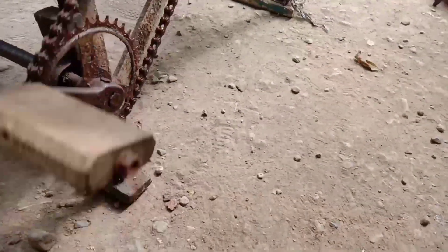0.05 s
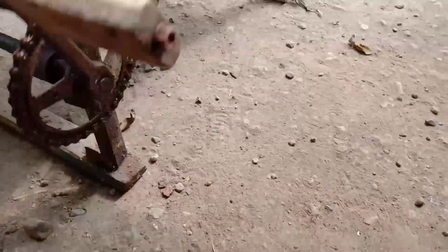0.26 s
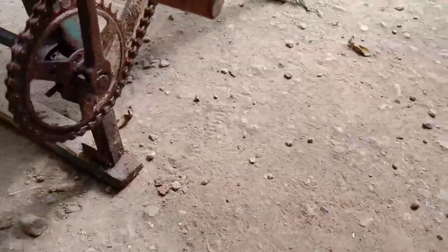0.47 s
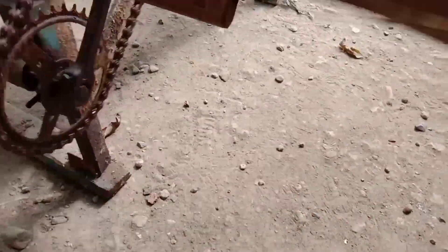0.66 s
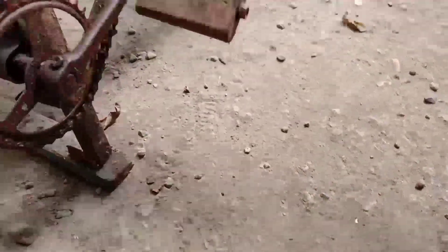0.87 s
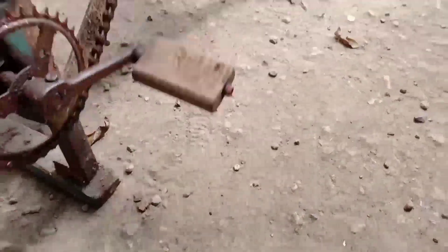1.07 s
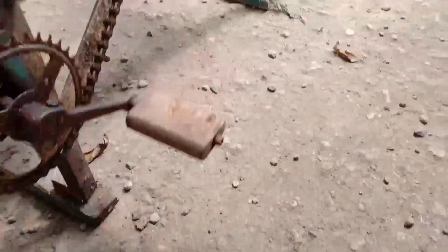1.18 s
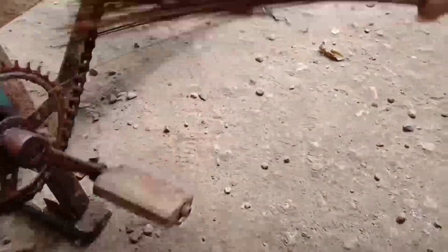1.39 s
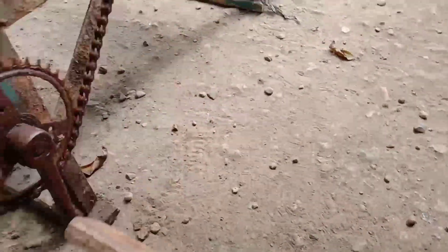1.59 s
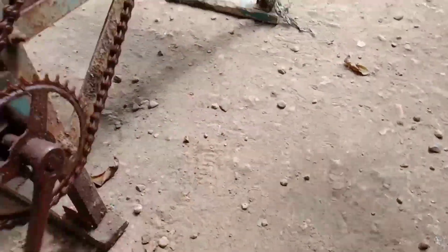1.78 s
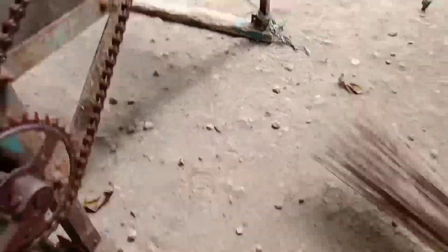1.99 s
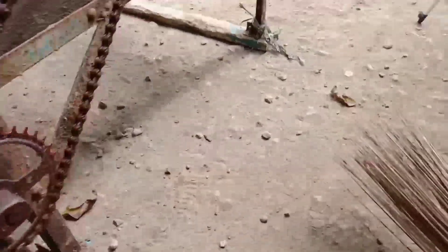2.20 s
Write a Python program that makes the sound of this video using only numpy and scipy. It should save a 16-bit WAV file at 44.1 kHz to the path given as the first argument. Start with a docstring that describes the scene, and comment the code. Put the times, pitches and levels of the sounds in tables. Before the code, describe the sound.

A stiff twig broom scrubs a rusty iron frame in raspy strokes, then drags over dirt

```python
"""A stiff twig broom scrubs a rusty iron frame outdoors, close to a phone, then drags once over the dirt.
Thousands of bristle tips slip as random ticks, coloured by the contact and by the frame's resonances.
Single twigs snap free as ticks with a noisy tail; the bundle knocks the frame as short damped sines.
Behind it a low hum wavers over faint outdoor hiss; the small microphone colours everything."""
import sys
import numpy as np
from scipy import signal
from scipy.fft import rfft, irfft
from scipy.io import wavfile
from scipy.ndimage import uniform_filter1d

SR = 44100
rng = np.random.default_rng(int(sys.argv[2]) if len(sys.argv) > 2 else 0)


def gain_from_db(level_db):
    """Convert decibel levels to linear amplitude factors (20 dB per decade)."""
    decades = np.asarray(level_db, float) / 20
    return 10 ** decades


def generate_wav(sig):
    """Save sig (samples, or channels by samples) to the path in sys.argv[1] as 16-bit PCM at SR."""
    pcm = np.round(np.clip(np.atleast_2d(sig).T, -1, 1) * 32767).astype(np.int16)
    wavfile.write(sys.argv[1], SR, pcm)


N = 99225
TIME = np.arange(N) / SR  # s

# Stroke of the broom on the iron, from its pressure: (time [s], level [dB])
SCRUB_STROKE = [(0, -50), (.02, -51.5), (.04, -62.5), (.1, -75.5), (.158, -70), (.161, -49), (.168, -56),
                (.17, -46), (.182, -44.5), (.202, -47.5), (.207, -36.5), (.236, -23), (.262, -26.5),
                (.29, -26), (.34, -27.5), (.37, -32), (.41, -40.5), (.46, -44), (.5, -46), (.53, -58),
                (.642, -73), (.645, -41), (.654, -43), (.667, -49), (.672, -31), (.69, -26.5),
                (.705, -30.5), (.732, -39), (.76, -33.5), (.788, -28.5), (.8, -29), (.86, -27),
                (.93, -30.5), (.945, -34), (.972, -30), (1.02, -32), (1.03, -39), (1.044, -37),
                (1.082, -42.5), (1.088, -36), (1.11, -37.5), (1.13, -35), (1.145, -42), (1.165, -38),
                (1.18, -37.5), (1.205, -50), (1.246, -50.5), (1.249, -41), (1.315, -38), (1.333, -42),
                (1.338, -30.5), (1.365, -27), (1.4, -28), (1.46, -27.5), (1.498, -24.5), (1.504, -31.5),
                (1.54, -25.5), (1.545, -37), (1.562, -31.5), (1.585, -41), (1.642, -39), (1.675, -42.5),
                (1.72, -50), (1.75, -50.5), (1.81, -49), (1.83, -42), (1.872, -48.5), (1.88, -57)]
# Spectrum of the twigs on iron: (frequency [Hz], level [dB per Hz])
SCRUB_COLOUR = [(240, -36), (420, -24), (560, -17.5), (1030, -16), (1230, -8.5), (1460, -13), (2300, -12.5),
                (4180, -7), (6200, -1), (7300, -2), (8500, -11.5), (11800, -18), (13700, -21), (14900, -3),
                (16000, -14.5)]
# How the twigs meet the iron: (time [s], brightness [dB per octave], gain of the low body [dB])
SCRUB_CONTACT = [(.05, -0.3, 1), (.18, 2, -25), (.23, 1, -12), (.31, 1.56, 4), (.47, 0.5, 0),
                 (.58, -1.5, -5), (.68, 2, -13), (.75, 0.3, -4.5), (.85, 1.76, 9.5), (1.03, 1.6, 0),
                 (1.07, 0.5, -17), (1.22, 0, -16), (1.3, 2, -10), (1.36, 1.5, -8), (1.42, 0.5, 6),
                 (1.55, 1.3, 4), (1.6, 0.5, -23), (1.685, 0.5, 8), (1.715, 0.5, -17), (1.85, 2, -7)]
# Modes of the iron frame under the bristles: (frequency [Hz], width [Hz], gain [dB])
FRAME_MODES = [(1268, 34, 1), (2093, 150, -6.5), (4450, 28, -6), (6070, 96, -7), (7200, 186, -3)]
# Hum in the distance of the scene: (frequency [Hz], width [Hz], mid level of its wavering [dB])
HUM = [(110.5, 95, -62), (232.5, 50, -69)]
# Swells of the low hum: (centre [s], time from centre to 1/e [s], rms level at centre [dB], pitch [Hz])
SWELLS = [(0.096, 0.027, -48.5, 112.6), (0.563, 0.024, -47.5, 128), (1.714, 0.012, -48, 117.7),
          (1.797, 0.036, -55, 105), (1.937, 0.016, -55, 133.8)]
# Spectrum of the outdoor hiss: (frequency [Hz], level [dB per Hz])
AIR_COLOUR = [(18, -36), (30, -4), (194, -3), (266, -9.5), (632, -14), (1590, -22), (6380, -25.5),
              (7090, -16.5), (8980, -40), (16000, -37)]
# Single twigs snapping free: (time [s], level [dB])
SNAPS = [(0.019, -37), (0.1695, -30.5), (0.4047, -28.5), (0.4277, -27), (0.4486, -32), (0.503, -33.5),
         (0.5257, -36.5), (.5385, -46), (0.558, -43.5), (0.58, -45), (0.593, -52), (.627, -52),
         (0.6467, -33), (0.6606, -28.5), (1.0884, -24.5), (1.1282, -22.5), (1.1582, -29), (1.2144, -33),
         (1.556, -25.5), (1.648, -27), (1.6904, -33.5), (1.7158, -33)]
# The bundle knocking the frame: (time [s], level [dB], pitch [Hz], 60 dB decay time [s])
KNOCKS = [(.463, -47.5, 614, 0.11), (.8286, -17, 773, 0.01), (0.829, -30.5, 246, 0.062),
          (.837, -33, 250, 0.018), (0.923, -37.5, 273, 0.027), (1.0, -38.5, 239, 0.083),
          (1.3918, -20.5, 1420, 0.011), (1.392, -32, 666, 0.015), (1.395, -23, 1146, 0.018),
          (1.4168, -19.5, 605, 0.011), (1.394, -33, 372, 0.024), (1.403, -36, 228, 0.038),
          (1.494, -41, 640, 0.043), (1.551, -37, 181, 0.036), (1.667, -44.5, 600, 0.03),
          (1.6765, -37.5, 1130, 0.017), (1.679, -44, 540, .05), (1.691, -45, 450, .03),
          (1.731, -40.5, 1307, 0.075), (1.79, -49.5, 586, 0.25), (1.856, -30.5, 1268, 0.13),
          (2.214, -49.5, 772, 0.028)]
# Stroke of the broom over the dirt: (time [s], level [dB])
DRAG_STROKE = [(1.726, -60), (1.729, -43.5), (1.76, -42.5), (1.8, -39), (1.82, -35.5), (1.845, -31.5),
               (1.872, -32), (1.88, -39), (1.892, -36.5), (1.898, -32), (1.908, -36), (1.945, -34.5),
               (1.97, -37), (2.015, -40), (2.05, -52.5), (2.075, -67), (2.088, -58), (2.115, -60),
               (2.14, -76), (2.2, -86), (2.225, -74), (2.25, -86)]
# Spectrum of the twigs on dirt: (frequency [Hz], level [dB per Hz])
DRAG_COLOUR = [(180, -53), (300, -29), (412, -15.5), (900, -19), (1230, -6), (1460, -12), (3000, -10.5),
               (5600, -15.5), (7400, -17), (8640, -31), (12900, -54.5), (15100, -44), (16000, -39)]
# How the twigs meet the dirt: (time [s], brightness [dB per octave], gain of the low body [dB])
DRAG_CONTACT = [(1.73, 1.2, -43), (1.8, -1.1, 1), (1.87, 2.1, 0), (1.95, -0.23, 0.5), (2.02, 1.3, -1.5),
                (2.1, 4.5, 0)]

SPARSE_BELOW_DB = -47.5  # on strokes lighter than this, fewer tips touch
STIFF_SHARE, STIFF_DB = .014, 8.5  # a few stiff twigs crack louder than the rest
BODY_HZ = 1050  # the low body lies below this
BAND_FLICKER_DB = 1
AIR_DB = -65  # rms
SNAP_TAIL_S, SNAP_TAIL_DB = 0.0018, -13.5  # spray of grit: time constant, level re the tick
# the freed twig quivers on against its neighbours: time constant, level re the tick, pitch
SNAP_QUIVER_S, SNAP_QUIVER_DB, SNAP_QUIVER_HZ = 0.0068, -21.5, 6800
SNAP_DB_PER_OCT = 4.5
KNOCK_PUSH_S = .0012  # time constant of the build-up
KNOCK_RATTLE_DB, KNOCK_RATTLE_HZ = -16.5, 720
MIC_LOW_HZ, MIC_TOP_HZ = 89.5, 15470
MIC_DIP_HZ, MIC_DIP_WIDTH_HZ, MIC_DIP_SHARE = 6610, 220, 0.57
MIC_CEILING = 0.35  # largest amplitude the rounding of peaks lets through


def level(x, db):
    """Scales x to an rms level in dB."""
    return x * gain_from_db(db) / np.sqrt(np.mean(x ** 2))


def walk(rate):
    """Random levels slewed linearly from one to the next, rate times a second; spread near 1."""
    hold = int(SR / rate)
    values = rng.standard_normal(N // hold + 1)
    return uniform_filter1d(np.repeat(values, hold)[:N], hold)


def peak(x, hz, width):
    """One resonance, gain 1 at its centre."""
    return signal.lfilter(*signal.iirpeak(hz, hz / width, SR), x)


def resonant(hz, width):
    """Noise through one resonance twice, rms 1."""
    once = peak(rng.standard_normal(N), hz, width)
    return level(peak(once, hz, width), 0)


def colour(x, points):
    """Causal minimum-phase filter with the given (Hz, dB) response, built from the cepstrum."""
    hz, db = np.array(points).T
    f = np.maximum(np.arange(2049) * SR / 4096, 1)
    log_gain = np.interp(np.log(f), np.log(hz), db) * np.log(10) / 20
    cepstrum = irfft(log_gain)
    # fold the negative times onto the positive ones
    cepstrum[1:2048] *= 2
    cepstrum[2049:] = 0
    response = irfft(np.exp(rfft(cepstrum)))
    return signal.fftconvolve(x, response)[:N]


def tilt(x, db_per_oct):
    """Octave bands on a slope about 4 kHz that may move in time; each flickers as twigs take turns."""
    spectrum = rfft(x)
    f = np.maximum(np.arange(N // 2 + 1) * SR / N, 1)
    octave = np.clip(np.log2(f / 4000), -4, 2)
    total = np.zeros(N)
    for k in range(-4, 3):
        band = irfft(spectrum * np.maximum(1 - abs(octave - k), 0), N)
        total += band * gain_from_db(k * db_per_oct + BAND_FLICKER_DB * walk(69.97))
    return total


def bristles(stroke, contact, points, per_s, scatter_db, patchy_db, release_s, sparse_share):
    """Random slips of many tips, uneven in size and bunched, following the stroke and ringing the frame."""
    stroke_s, stroke_level = np.array(stroke).T
    contact_s, brightness, body_gain = np.array(contact).T
    db = np.interp(TIME, stroke_s, stroke_level, left=-120)
    # after its last point the stroke falls 20 dB every release_s
    db = db - 20 * np.maximum(TIME - stroke_s[-1], 0) / release_s
    # share of the tips that touch
    share = np.clip(gain_from_db(db - SPARSE_BELOW_DB), sparse_share, 1)
    slips = rng.random(N) < share * per_s / SR
    size_db = 2 * scatter_db * rng.uniform(-0.74, 1, N)
    bunching_db = patchy_db * (walk(110) + walk(600))
    ticks = slips * np.sign(rng.standard_normal(N)) * gain_from_db(size_db + bunching_db)
    ticks = ticks * gain_from_db(STIFF_DB * (rng.random(N) < STIFF_SHARE))
    ticks = ticks / np.sqrt(share)  # fewer tips, each stronger
    ringing = sum(gain_from_db(gain) * peak(ticks, hz, width) for hz, width, gain in FRAME_MODES)
    x = level(colour(ticks + ringing, points), 0)
    x = tilt(x, np.interp(TIME, contact_s, brightness))
    body = signal.sosfiltfilt(signal.butter(4, BODY_HZ, fs=SR, output="sos"), x)
    x = x + body * (gain_from_db(np.interp(TIME, contact_s, body_gain)) - 1)
    return x * gain_from_db(db)


def scrub():
    """Stiff twigs stick and slip on rusty iron: dense ticks that thin out where the stroke is light."""
    return bristles(SCRUB_STROKE, SCRUB_CONTACT, SCRUB_COLOUR, per_s=12000, scatter_db=2, patchy_db=1,
                    release_s=.03, sparse_share=0.067)


def background():
    """A wavering low hum of resonant noise, swelling now and then as short sines, over faint hiss."""
    hum = sum(gain_from_db(db + 4.9 * walk(14)) * resonant(hz, width) for hz, width, db in HUM)
    swells = np.zeros(N)
    for centre, length, db, hz in SWELLS:
        bell = np.exp(-((TIME - centre) / length) ** 2)
        swells += gain_from_db(db) * np.sqrt(2) * np.sin(2 * np.pi * hz * TIME) * bell
    hiss = level(colour(rng.standard_normal(N), AIR_COLOUR), AIR_DB)
    return hum + swells + hiss


def snaps():
    """A twig springs free: a sharp tick, a short spray of grit and a duller quiver after it."""
    x = np.zeros(N)
    grit = rng.standard_normal(N)
    quiver = resonant(SNAP_QUIVER_HZ, 3500)
    for start, db in SNAPS:
        since = np.maximum(TIME - start, 0)
        begun = TIME > start
        x[int(start * SR)] += gain_from_db(db)
        x += gain_from_db(db + SNAP_TAIL_DB) * grit * begun * np.exp(-since / SNAP_TAIL_S)
        x += gain_from_db(db + SNAP_QUIVER_DB) * quiver * begun * np.exp(-since / SNAP_QUIVER_S)
    # a unit click keeps a peak of 1 through the colouring
    click = colour(np.eye(1, 4096)[0], SCRUB_COLOUR)
    return tilt(colour(x, SCRUB_COLOUR) / np.max(abs(click)), SNAP_DB_PER_OCT)


def ring(since, hz, t60):
    """A damped sine that builds up over the length of the push."""
    decay = np.exp(-np.log(1000) * since / t60)
    return np.sin(2 * np.pi * hz * since) * decay * (1 - np.exp(-since / KNOCK_PUSH_S))


def knocks():
    """A short dull blow at its own pitch, with a noisy rattle that loses 30 dB while the blow loses 60."""
    x = np.zeros(N)
    rattle = resonant(KNOCK_RATTLE_HZ, 1570)
    for start, db, hz, t60 in KNOCKS:
        since = np.maximum(TIME - start, 0)
        rattling = rattle * (TIME > start) * gain_from_db(KNOCK_RATTLE_DB - 30 * since / t60)
        x += gain_from_db(db) * (ring(since, hz, t60) + rattling)
    return x


def drag():
    """Twigs rake the dirt once: sparser, more uneven slips that still ring the frame's modes."""
    return bristles(DRAG_STROKE, DRAG_CONTACT, DRAG_COLOUR, per_s=8000, scatter_db=4.0, patchy_db=1,
                    release_s=1, sparse_share=.6)


def scene():
    """Broom on iron and dirt, snaps, knocks and the outdoor background, summed to one channel."""
    return (scrub() + background() + snaps() + knocks() + drag())[None]


def low_pass(x):
    """Removes everything above the highest recorded frequency."""
    return signal.sosfilt(signal.butter(12, 16870, fs=SR, output="sos"), x)


def record(dry):
    """The phone's microphone drops deep bass, dips at its port, rounds peaks and cuts the top steeply."""
    x = signal.sosfilt(signal.butter(1, MIC_LOW_HZ, "high", fs=SR, output="sos"), dry)
    x = x - MIC_DIP_SHARE * peak(x, MIC_DIP_HZ, MIC_DIP_WIDTH_HZ)
    x = MIC_CEILING * np.tanh(x / MIC_CEILING)
    mix = signal.sosfilt(signal.ellip(12, .3, 45, MIC_TOP_HZ, fs=SR, output="sos"), x)
    return low_pass(mix)


dry = scene()
out = record(dry)
generate_wav(out)
```